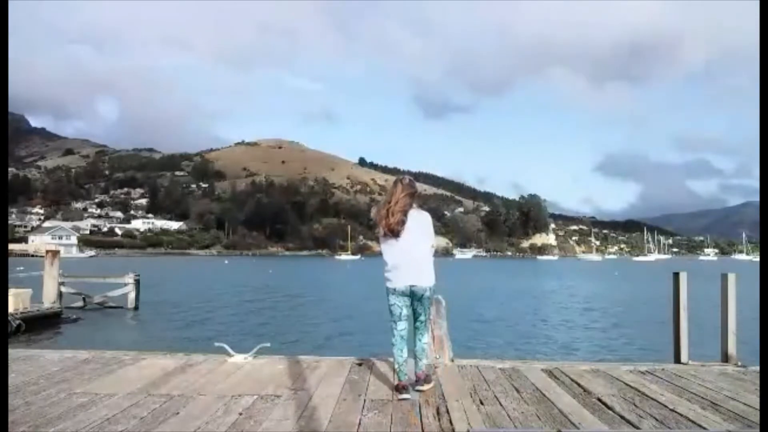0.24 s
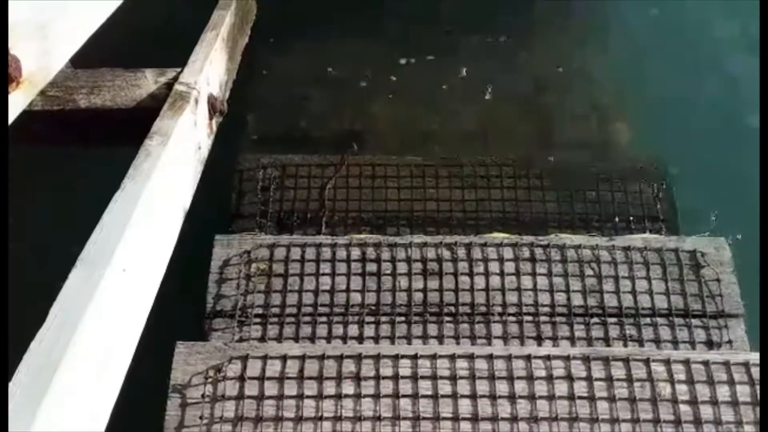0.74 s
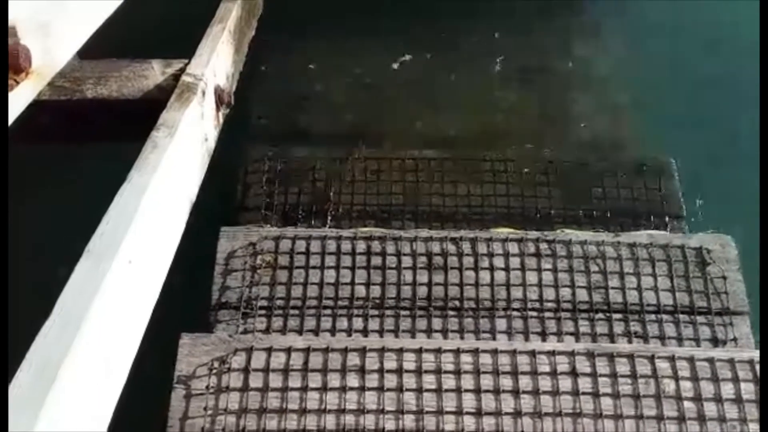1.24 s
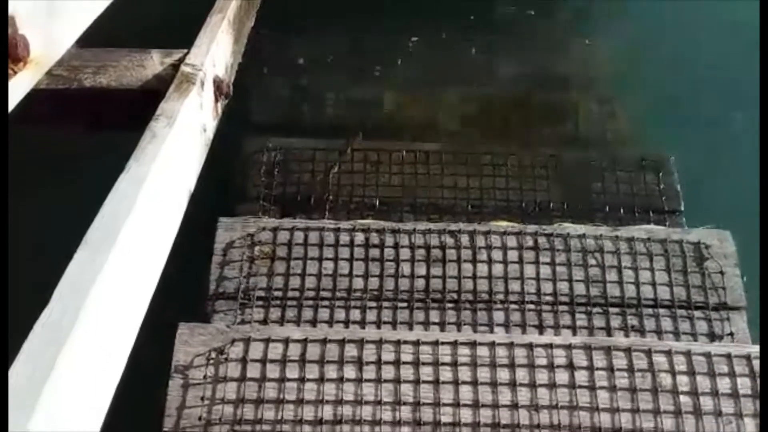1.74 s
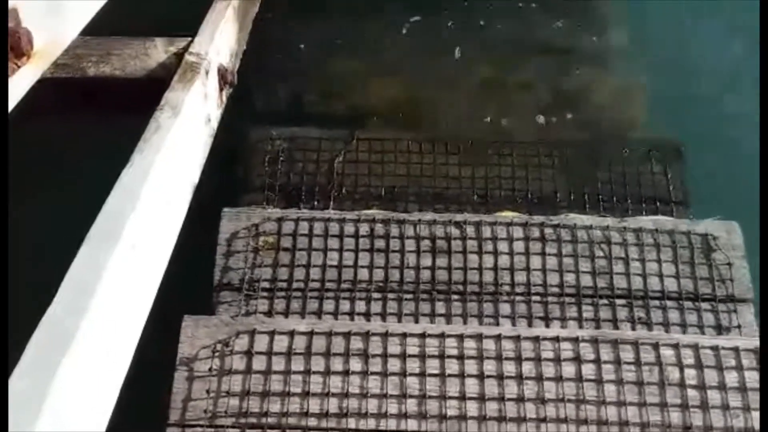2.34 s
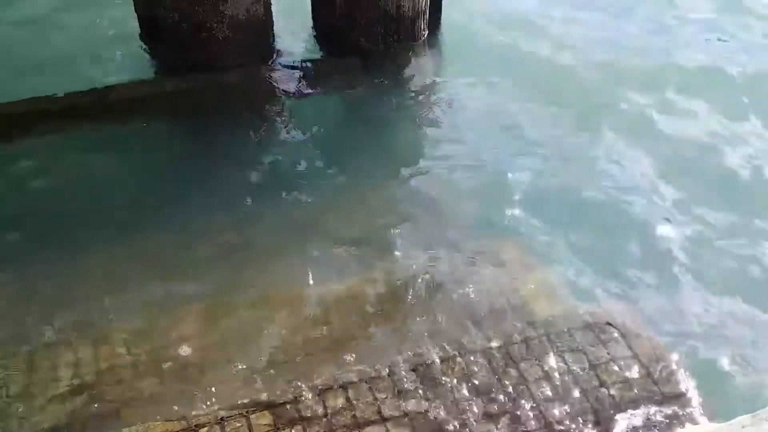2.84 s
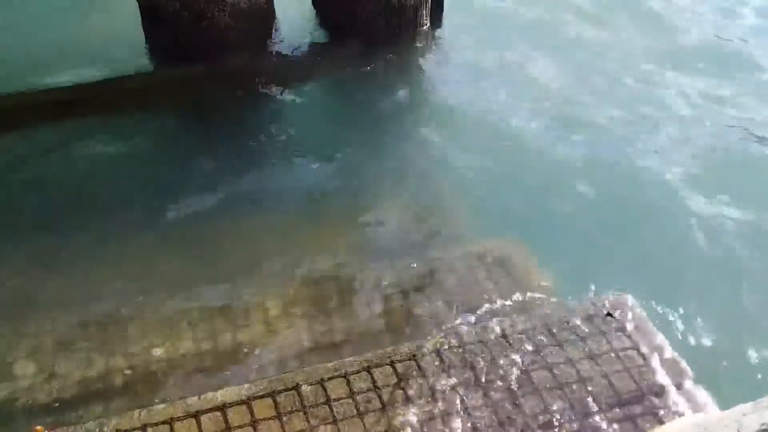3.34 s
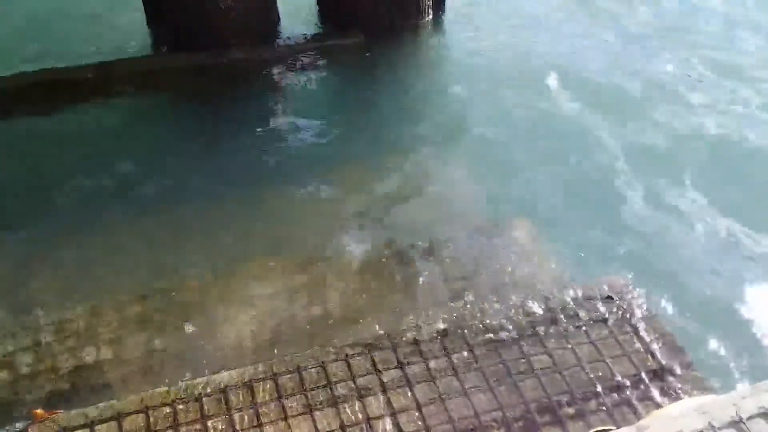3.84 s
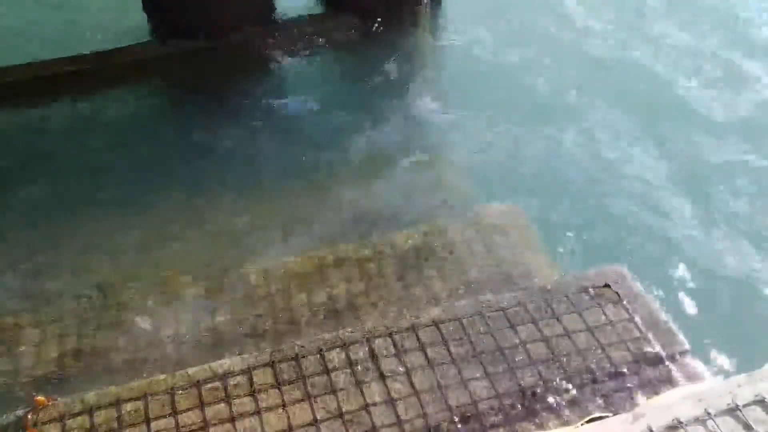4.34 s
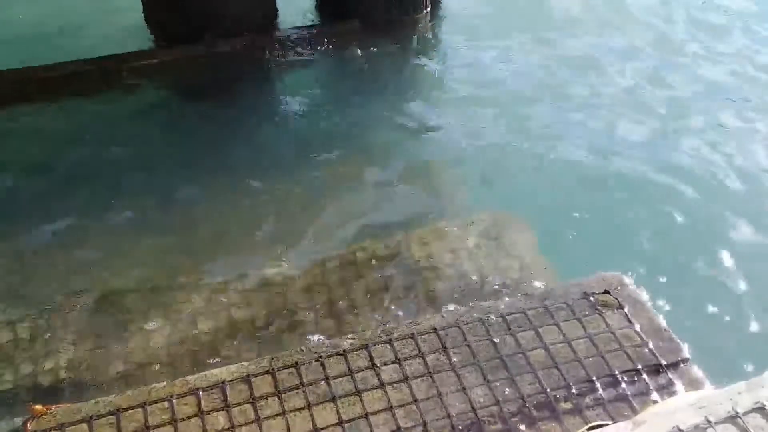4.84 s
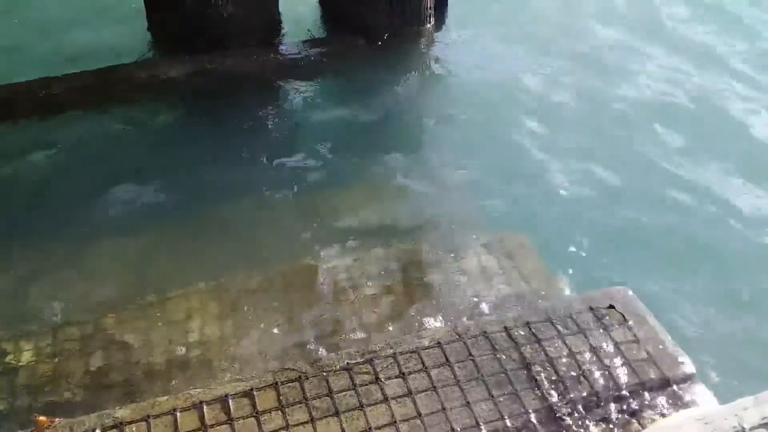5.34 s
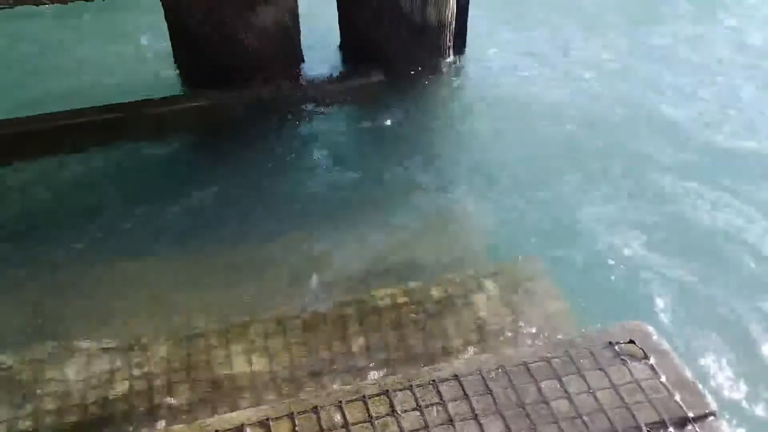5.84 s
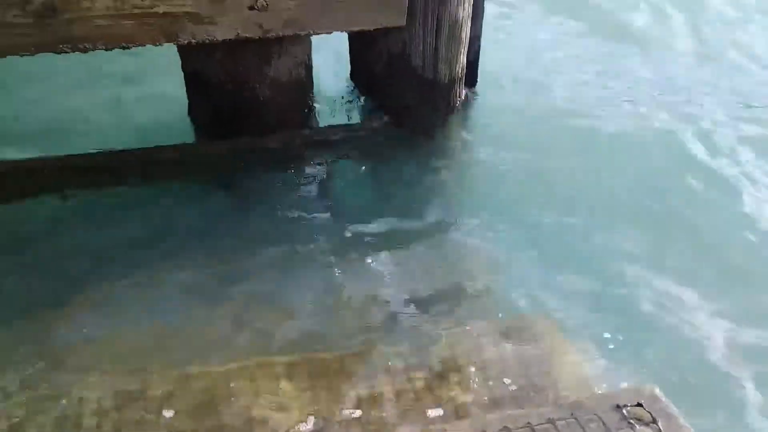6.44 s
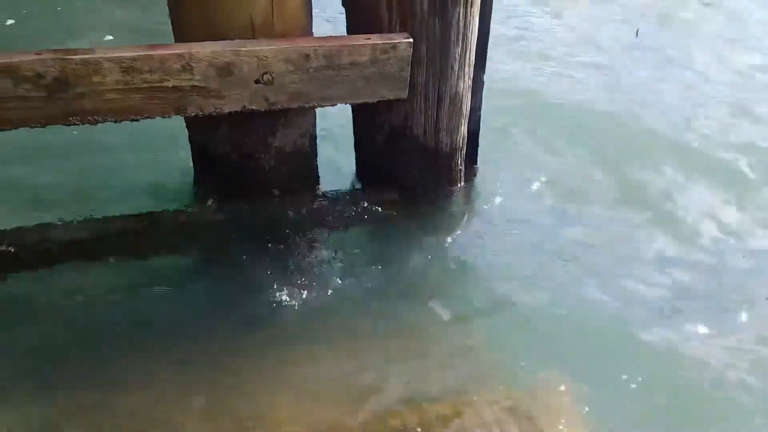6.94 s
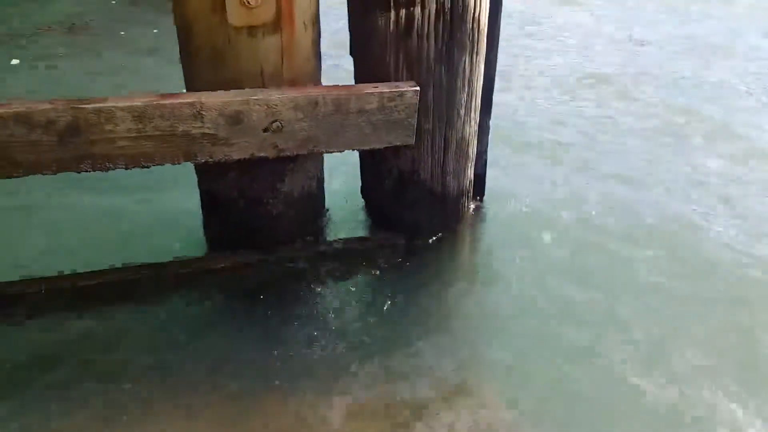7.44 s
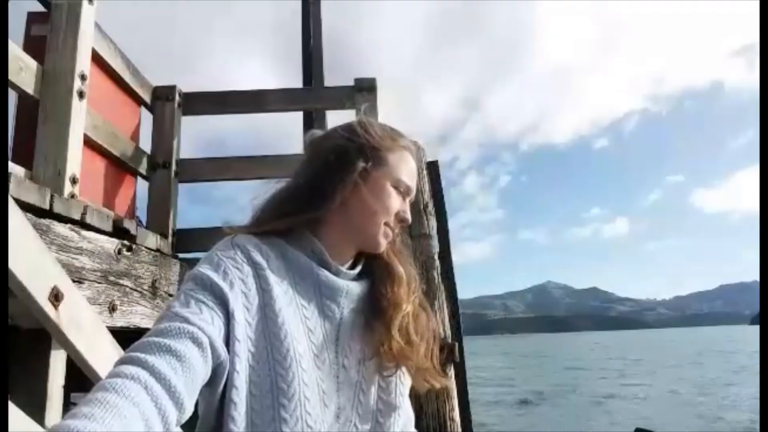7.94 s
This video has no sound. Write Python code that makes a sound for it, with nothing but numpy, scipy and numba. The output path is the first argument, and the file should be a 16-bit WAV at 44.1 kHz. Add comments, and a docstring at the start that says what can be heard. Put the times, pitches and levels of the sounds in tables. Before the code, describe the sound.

Sea water plays against timber, heard close by a small microphone in light wind. It starts almost silent, with soft steady harbour noise, then cuts to crisp trickling wavelets and ticking droplets on steps. A duller, rounder slosh with irregular laps, hollow gulps and wind thumps follows around piles. After a tiny gap, much louder deep gulps, a slap and a bright plop end it. Echoes are short.

```python
"""Sea water against a wooden wharf, heard from four places in turn, with short silences between.
First the deck: steady shaped noise for the open harbour; then the steps, the piles with a faint wavering hum,
and last the waterline, loud and gulping. From the steps on, wavelets build and drain as clouds of ringing bubbles.
Throughout, drops plip, air pockets gulp and noise bursts slap the timber, with brief echoes;
wind is a swelling low rumble with short decaying buffets."""
import sys
import numpy as np
from scipy import signal
from scipy.fft import rfft, irfft, next_fast_len
from scipy.io import wavfile
from scipy.ndimage import uniform_filter1d
from numba import njit

SR = 44100
rng = np.random.default_rng(int(sys.argv[2]) if len(sys.argv) > 2 else 0)


def transcribe(u):
    """Save the signal u as a 16-bit wav file named by the first command-line argument.

    u: samples, shape (n,) or (channels, n), limited to [-1, 1]; the rate is SR.
    q: integer samples, one column per channel.
    """
    v = np.clip(np.atleast_2d(u).T, -1, 1)
    q = np.round(v * 32767).astype(np.int16)
    wavfile.write(sys.argv[1], SR, q)


N = 361179
TIME = np.arange(N) / SR
CONTROL_S = np.arange(0, N / SR, .001)   # 1 ms grid for slow envelopes

# listening places: (start [s], end [s])
DECK, STEPS, PILES, WATERLINE = (-0.05, 0.46), (0.468, 2.63), (2.632, 7.54), (7.70, 8.25)
# water at rest: (gurgle [dB], splash [dB], spray [dB]), before each place's trim
STEPS_REST, PILES_REST, WATERLINE_REST = (-62.5, -62.5, -67), (-58.5, -63, -68), (-47.5, -49.5, -60.5)
# wavelets on the timber: (crest [s], splash [dB], build-up [s], splash drain [s],
#                          gurgle [dB re splash], spray [dB re splash])
WAVELETS = [(0.502, -55.5, 0.0051, 0.15, -1, -5.5), (0.61, -52, .04, .05, 1, -6),
            (0.677, -46.5, .02, 0.085, -7, -8.5), (1.139, -51, 0.0066, 0.056, -8, -21),
            (1.235, -54, 0.013, 0.041, -20, -15), (1.348, -59, .004, .016, -11, 10),
            (1.383, -51.5, 0.029, .035, -13, -9), (1.502, -49, 0.033, 0.095, -12, -5.5),
            (1.72, -48, .042, .05, -1, -5), (2.01, -58, .006, 0.095, -1, -5),
            (2.115, -59.5, 0.016, 0.12, -3, -1), (2.345, -55, 0.0052, 0.12, -4, 1.5),
            (2.50, -51, 0.049, 0.085, -12.5, -6.5), (2.712, -59.5, 0.034, .05, 6.5, -1.5),
            (2.84, -52.5, 0.048, 0.12, -3.5, 1.5), (2.97, -50.5, 0.025, 0.057, -1.5, -2),
            (3.06, -50, 0.09, 0.14, -2, -4.5), (3.2, -52.5, 0.054, 0.11, -5, -8),
            (3.305, -48.5, 0.011, 0.069, -5.5, 0), (3.435, -51.5, 0.068, 0.17, -1, -3.5),
            (3.535, -49.5, 0.1, 0.06, -3.5, 1.5), (3.635, -51, 0.022, 0.028, -17, -4),
            (3.73, -52, 0.027, 0.074, 2.5, -7), (3.805, -44, 0.046, 0.048, -14, -7.5),
            (3.894, -39.5, 0.0095, 0.056, -4, -5), (4.115, -53, 0.097, .08, -13, -3),
            (4.272, -63.5, 0.015, 0.025, 12, -8), (4.535, -52.5, .065, .1, 1, -4.5),
            (4.875, -59, 0.014, 0.034, -13, -14), (5.041, -48.5, .035, 0.034, -3, 0),
            (5.105, -56.5, .02, 0.029, -3, -2), (5.42, -59.5, 0.038, 0.089, -15, 0.5),
            (5.615, -51.5, 0.037, 0.06, -11, -10), (5.98, -60, .08, 0.11, 2, 2),
            (6.17, -61, 0.019, 0.15, -10, 1.5), (6.257, -48, 0.014, .02, -11, 0),
            (6.408, -40, 0.006, 0.024, -8, -12), (6.453, -39, 0.0083, 0.011, -7, -4.5),
            (6.529, -50, 0.045, 0.081, 2, -3.5), (6.675, -49.5, 0.038, 0.025, 1.5, -4.5),
            (6.736, -49, 0.037, 0.033, 3, -1), (6.90, -55, .02, .07, 5, -9),
            (7.01, -51, 0.054, 0.06, 0.5, -7.5), (7.108, -44.5, 0.013, 0.029, 0, -4),
            (7.197, -46.5, 0.042, 0.051, -2.5, -9), (7.24, -50.5, .014, 0.028, -6, 2.5),
            (7.342, -52.5, 0.026, 0.093, -3, -1.5), (7.505, -55, 0.013, 0.062, 6.5, -11.5),
            (7.752, -41.5, 0.04, 0.15, 8.5, -11), (7.865, -37.5, 0.052, 0.13, 3, -11),
            (7.934, -28.5, 0.023, 0.036, -14, -5), (7.97, -33, .016, 0.039, 0, -10)]
# relative spectrum of the water at each place: (frequency [Hz], density [dB per Hz])
STEPS_COLOUR = [(220, -0.5), (330, -2), (600, -1.5), (850, -1.5), (1100, -7), (1600, -1.0), (2500, -0.5),
                (4000, -13.5), (5500, -14.0), (7000, -9.5), (8300, -11.5), (9500, -20.5), (11000, -14),
                (12800, -14)]
PILES_COLOUR = [(220, 0), (330, -5.5), (550, -4), (850, -6.5), (1100, -10.5), (2300, -10), (4400, -22.5),
                (6500, -26.5), (8300, -25.5), (9500, -30.5), (11000, -30), (12800, -30)]
WATERLINE_COLOUR = [(220, -3.5), (320, -0.5), (450, -5.5), (600, -2), (1000, -3.5), (1400, -11),
                    (2300, -11), (3300, -16), (6000, -21), (8300, -20), (10000, -27), (12800, -24)]
# drops that each trap one small bubble: (time [s], level [dB], starting pitch [Hz])
PLIPS = [(0.15, -46, 1580), (0.539, -39.5, 2060), (1.3437, -23, 7650), (1.3448, -24, 11960),
         (1.3748, -36, 1980), (1.4576, -33.5, 7850), (1.4955, -32, 1680), (1.546, -38, 8140),
         (1.704, -28.5, 3930), (2.0013, -31, 1360), (2.3386, -34, 1460), (2.4975, -39, 1710),
         (3.037, -33.5, 1750), (3.2974, -34, 2240), (3.4301, -32, 8300), (3.5216, -33, 3320),
         (4.1462, -34, 1900), (4.172, -35, 4700), (4.549, -40, 1076), (6.257, -35, 1123),
         (6.4035, -27.5, 2350), (6.4514, -27.5, 1745), (6.555, -36, 1510), (7.0055, -28.5, 1660),
         (7.1013, -29.5, 1850), (7.2345, -33, 2680), (7.3723, -34, 2165), (7.9963, -16, 3390)]
# large air pockets closing: (time [s], level [dB], starting pitch [Hz], decay to 1/e [cycles])
GULPS = [(0.148, -36, 830, 2.3), (0.4975, -36.5, 568, 3.1), (1.130, -38.5, 1170, 18),
         (1.735, -34.5, 967, 7.9), (1.78, -40.5, 579, 5.6), (2.339, -39, 850, 6.7), (3.2, -43, 500, 7.2),
         (3.534, -34.5, 577, 9), (3.721, -28.5, 366, 1.5), (4.975, -40.5, 830, 6.6),
         (5.012, -39.5, 736, 14), (5.234, -35.5, 350, 2.2), (6.517, -35.5, 510, 8.9),
         (6.668, -40, 818, 10.5), (6.723, -36.5, 511, 14), (7.005, -29.5, 667, 11.4),
         (7.758, -24, 962, 8.6), (7.866, -26, 970, 7.2), (7.896, -9.5, 595, 2.3), (7.933, -20.5, 607, 4.3),
         (7.959, -19.5, 643, 8.5), (8.046, -18, 1055, 3.7), (8.095, -30, 966, 7.4), (8.119, -27, 376, 3.5)]
# crests slapping timber: (time [s], level before trim [dB], reference pitch [Hz], decay to 1/e, floored later [s])
SLAPS = [(1.376, -38, 2100, .0045), (1.494, -45, 1690, .006), (1.704, -35.5, 3720, 0.0018),
         (1.9998, -34.5, 1720, 0.0054), (3.0369, -38.5, 1750, 0.0022), (3.43, -38, 1580, 0.0068),
         (3.889, -45, 1100, .017), (4.147, -42, 1870, .003), (4.974, -35, 861, .004),
         (5.044, -39.5, 1500, 0.0045), (6.258, -35, 1150, .0045), (6.451, -48, 1690, 0.0026),
         (6.88, -44.5, 1600, 0.0053), (7.336, -39.5, 2130, 0.0033), (7.934, -22.5, 725, 0.0065)]
# gusts on the microphone: (peak time [s], rumble [dB], swell and fade time to 1/e [s])
GUSTS = [(0.03, -51, 0.11), (0.33, -55, 0.073), (2.72, -41, 0.055), (3.05, -43, 0.29), (3.9, -59, 0.52),
         (4.46, -51, 0.15), (4.77, -52.5, 0.14), (5.32, -51, 0.1), (5.74, -50, 0.22), (6.2, -53, 0.36),
         (6.9, -49.5, 0.27), (7.27, -46.5, 0.38), (7.95, -52, 0.19)]
# relative spectrum of the wind rumble: (frequency [Hz], density [dB per Hz])
WIND_COLOUR = [(15, -47.5), (25, -35), (52, -2.5), (76, 0), (120, -1), (205, -7.5), (244, -20.5),
               (269, -24), (330, -17.5), (430, -61), (730, -120)]
# single eddies striking the microphone: (time [s], peak [dB], pitch [Hz])
BUFFETS = [(0.028, -29.5, 81), (0.299, -33.5, 77.5), (0.347, -35, 106), (2.67, -35, 89.5),
           (2.711, -26, 182), (2.741, -29, 127), (2.905, -25, 124), (2.938, -29, 94.2), (3.048, -28.5, 133),
           (5.758, -35, 78.1), (6.839, -32.5, 118), (7.181, -27, 110), (7.217, -33.5, 115),
           (7.241, -30, 73)]
# relative spectrum of the open harbour: (frequency [Hz], density [dB per Hz])
HARBOUR_COLOUR = [(250, 0), (420, -2.5), (800, -2), (1500, -7.5), (2500, -19), (5000, -25.5), (8200, -34),
                  (13000, -28.5)]

DRAIN_SHARES = np.array([[1.34], [1], [1]])   # gurgle, splash, spray: drain time re splash
RIPPLE_DB, RIPPLES_PER_S = 0.88, 20
PLIP_CYCLES_AT_1KHZ, PLIP_CYCLES_POWER = 6.9, 0.2   # decay to 1/e, growing with this power of pitch
GLIDE_PER_CYCLE = 0.0075   # pitch rise [share] after one 1/e life, per cycle of that life
WHARF_T60_S, WHARF_DB = 0.17, -14.5   # echo level re direct sound
BREEZE_DB = -64   # rumble between gusts
HUM_HZ, HUM_DB = 240.8, -64   # centre pitch and level, before wavering
HARBOUR_DB = -60.5
CUTOFF_HZ = 13150


def from_db(db):
    """Decibels to amplitude gain."""
    return 10 ** (np.asarray(db) / 20)


def rms_one(x):
    """Scale to unit rms."""
    return x / np.sqrt(np.mean(x ** 2) + 1e-20)


def in_time(rows):
    """Interpolate each column after the first at every sample."""
    s, *columns = np.transpose(rows)
    return [np.interp(TIME, s, column) for column in columns]


def add(out, s, sound):
    """Mix a sound in at a time in seconds."""
    at = max(0, round(s * SR))
    out[at:at + len(sound)] += sound[:max(0, N - at)]


def band(x, low_hz, high_hz, order=2):
    """Butterworth band-pass."""
    edges_hz = [low_hz, min(high_hz, .45 * SR)]
    return signal.sosfilt(signal.butter(order, edges_hz, "band", fs=SR, output="sos"), x)


def coloured(x, spectrum):
    """Weight by a spectrum interpolated over log frequency; rms 1."""
    size = next_fast_len(N + 4096)
    hz, db = np.transpose(spectrum)
    grid_hz = np.maximum(np.fft.rfftfreq(size, 1 / SR), 1)
    gain = from_db(np.interp(np.log(grid_hz), np.log(hz), db))
    return rms_one(irfft(rfft(x, size) * gain, size)[:N])


def drift(per_s):
    """Random wander through normal knots at this rate; rms 1."""
    knots = rng.standard_normal(1000)
    return rms_one(np.interp(TIME * per_s, np.arange(len(knots)), knots))


def wash(rest, colour, fizz_per_s, drips_per_s, drips_db, far_db, level_db, clump_db=2.5):
    """Dense fizz, sparser drips and far-water hiss; large, middling and tiny bubbles each follow the flow."""
    clumps = from_db(clump_db * drift(110))   # bubbles are born in little clusters
    fizz = bubble_cloud(fizz_per_s, spread_db=3.5, cycles=3.63)
    drips = band(bubble_cloud(drips_per_s, spread_db=4.0, cycles=7.0, rise=0.025), 300, 7500)
    near_water = wharf(clumps * (fizz + from_db(drips_db) * drips))
    far_water = from_db(far_db) * rng.standard_normal(N)
    water = coloured(near_water + far_water, colour)
    out = np.zeros(N)
    bands_hz = [(220, 1200), (1200, 4000), (4000, 15000)]   # gurgle, splash, spray
    for edges_hz, flow_db in zip(bands_hz, in_time(flow(rest))):
        bubbles = band(water, *edges_hz, order=4)
        # even out the 0.2 s level, so that the flow sets the slow swell
        own_swell = np.sqrt(uniform_filter1d(bubbles ** 2, size=SR // 5) + 1e-12)
        out += bubbles / own_swell * from_db(flow_db + level_db)
    return out


def flow(rest):
    """Wavelets build to a crest and drain, gurgle lingering: rows of (s, gurgle dB, splash dB, spray dB)."""
    power = from_db(rest)[:, None] ** 2
    for crest_s, splash_db, build_s, drain_s, gurgle_db, spray_db in WAVELETS:
        age_s = CONTROL_S - crest_s
        build = (age_s / build_s) ** 2
        drain = age_s / (drain_s * DRAIN_SHARES)
        envelope = np.exp(-np.where(age_s < 0, build, drain))
        crest = from_db([[splash_db + gurgle_db], [splash_db], [splash_db + spray_db]])
        power = power + (crest * envelope) ** 2
    ripples_db = RIPPLE_DB * np.interp(CONTROL_S, TIME, drift(RIPPLES_PER_S))
    return np.column_stack([CONTROL_S, *(10 * np.log10(power) + ripples_db)])


def bubble_cloud(per_s, spread_db, cycles, rise=0.0099):
    """Random bubbles of all sizes, roughly equal power per Hz; small ones ring for more cycles; rms 1."""
    when, size, force, damping, depth = rng.random((int(per_s * N / SR), 5)).T
    hz = 200 * (1 + 7.1 * size) ** 2
    force_db = spread_db * np.minimum(-np.log(1 - force), 3.5)
    height = hz ** .65 * from_db(force_db)
    ring_cycles = max(cycles, 2) * (.6 + .8 * damping) * (hz / 1000) ** .25
    return rms_one(ring_bubbles(when * N / SR, height, hz, ring_cycles, 2 * rise * depth))


@njit
def ring_bubbles(start_s, height, hz, cycles, rise):
    """Each bubble swells within a cycle or two, then dies away, gliding up ever faster as it nears the surface."""
    out = np.zeros(N)
    for k in range(len(hz)):
        at = int(start_s[k] * SR)
        life = cycles[k] * SR / hz[k]   # samples to fall to 1/e
        for i in range(min(int(5.5 * life), N - at)):
            age = i / life
            turns = cycles[k] * age * (1 + rise[k] * age * age / 3)
            swell = turns ** 2 / (turns ** 2 + .25)
            out[at + i] += height[k] * np.exp(-age) * swell * np.sin(2 * np.pi * turns)
    return out


def gulps(level_db=0.0):
    """Air pockets under the timber: low rings gliding upward, further when they ring for more cycles."""
    s, db, hz, cycles = np.array(GULPS, float).T.copy()
    return ring_bubbles(s, from_db(db + level_db), hz, np.maximum(cycles, 1), GLIDE_PER_CYCLE * cycles)


def plips(level_db=0.0, rise=0.0065):
    """Single drops: short, bright rings; smaller bubbles ring for more cycles."""
    s, db, hz = np.array(PLIPS, float).T.copy()
    cycles = PLIP_CYCLES_AT_1KHZ * (hz / 1000) ** PLIP_CYCLES_POWER
    return ring_bubbles(s, from_db(db + level_db), hz, cycles, np.full(len(s), rise))


def slaps(level_db=-3.5, spray_db=-1.0, attack_s=0.000084, grain=0.32):
    """A crest bursts on wood: a decaying noise splat, hollow band plus a crackle of spray."""
    out, t = np.zeros(N), TIME[:SR // 5]
    for s, db, hz, decay_s in SLAPS:
        lumps = rms_one(uniform_filter1d(rng.standard_normal(len(t)), size=40))
        burst = rng.standard_normal(len(t)) * np.exp(grain * lumps)
        hollow = rms_one(band(burst, hz * 0.5, hz * 2.84))
        spray = from_db(spray_db) * rms_one(band(burst, 3300, 8800))
        envelope = (1 - np.exp(-t / attack_s)) * np.exp(-t / max(decay_s, .002))
        add(out, s, from_db(db + level_db) * (hollow + spray) * envelope)
    return out


def wharf(x, dull_hz=3500, build_s=0.0025):
    """Scattered reflections from piles, planks and water: band-passed, decaying noise as the echo response."""
    t = TIME[:SR // 2]
    echoes = rng.standard_normal(len(t)) * from_db(-60 * t / WHARF_T60_S) * (1 - np.exp(-t / build_s))
    echoes = band(echoes, 160, dull_hz)
    return x + from_db(WHARF_DB) * signal.fftconvolve(x, echoes / np.linalg.norm(echoes))[:N]


def wind(rumble_db=0.0, lumpy_db=1.5, buffet_db=0.0, swell_cycles=0.69):
    """Lumpy rumble that swells with each gust, and eddies that shake the air in the port for a few cycles."""
    power = from_db(BREEZE_DB) ** 2
    for s, db, swell_s in GUSTS:
        power = power + (from_db(db) * np.exp(-((CONTROL_S - s) / swell_s) ** 2)) ** 2
    strength = np.interp(TIME, CONTROL_S, np.sqrt(power))
    lumps = from_db(rumble_db + lumpy_db * drift(25))
    out = coloured(rng.standard_normal(N), WIND_COLOUR) * strength * lumps
    t = TIME[:SR // 8]
    for s, db, hz in BUFFETS:
        age = t * hz / swell_cycles
        envelope = (age * np.exp(1 - age)) ** 2   # peaks at 1 after swell_cycles
        add(out, s, from_db(db + buffet_db) * envelope * np.sin(2 * np.pi * (hz * t + rng.random())))
    return out


def hum(waver_db=-2.5, waver_hz=1.305):
    """A faint sine from across the harbour, wavering in pitch and level."""
    phase = 2 * np.pi * np.cumsum(HUM_HZ + waver_hz * drift(7.2)) / SR
    return np.sqrt(2) * from_db(HUM_DB + waver_db * drift(5.5)) * np.sin(phase)


def harbour():
    """Open harbour from the deck: steady noise, falling toward the treble."""
    return from_db(HARBOUR_DB) * coloured(rng.standard_normal(N), HARBOUR_COLOUR)


def heard_at(place, fade_s=0.024):
    """Gain that fades a place in and out."""
    start_s, end_s = place
    return np.clip(np.minimum(TIME - start_s, end_s - TIME) / fade_s, 0, 1) ** 2


def scene():
    """The water of each place in turn, with the single splashes and the wind on top."""
    steps = wash(STEPS_REST, STEPS_COLOUR, fizz_per_s=7000, drips_per_s=180,
                 drips_db=-4.5, far_db=2.5, level_db=-0.76)
    piles = wash(PILES_REST, PILES_COLOUR, fizz_per_s=6000, drips_per_s=400,
                 drips_db=-0.5, far_db=0.5, level_db=-1.0)
    waterline = wash(WATERLINE_REST, WATERLINE_COLOUR, fizz_per_s=5400, drips_per_s=700,
                     drips_db=-3.5, far_db=-0.5, level_db=-2.0)
    near = wharf(plips() + gulps() + slaps()) + wind()
    places = [(DECK, harbour()), (STEPS, steps), (PILES, piles + hum()), (WATERLINE, waterline)]
    return sum(heard_at(place) * (water + near) for place, water in places)[None]


def record(dry, port_hz=8200, port_db=-2.0, dip_hz=10300, dip_share=0.65, low_cut_hz=42):
    """The microphone port has a peak and a dip in the treble; deep bass and the top are cut."""
    peak = signal.lfilter(*signal.iirpeak(port_hz, 5, fs=SR), dry)
    dip = signal.lfilter(*signal.iirpeak(dip_hz, 4, fs=SR), dry)
    ported = dry + from_db(port_db) * peak - dip_share * dip
    low_cut = signal.butter(3, low_cut_hz, "high", fs=SR, output="sos")
    top_cut = signal.ellip(12, .2, 70, CUTOFF_HZ, fs=SR, output="sos")
    return signal.sosfilt(top_cut, signal.sosfilt(low_cut, ported))


dry = scene()
out = record(dry)
transcribe(out)
```